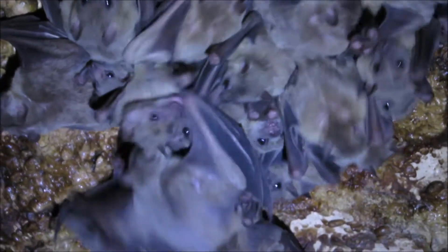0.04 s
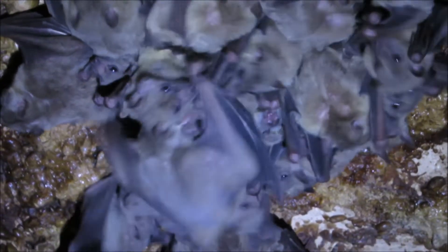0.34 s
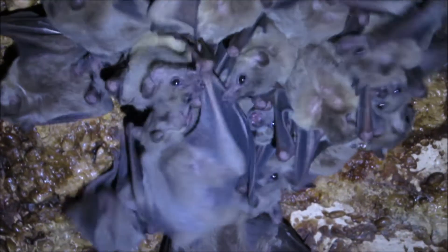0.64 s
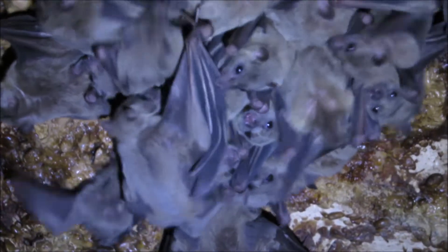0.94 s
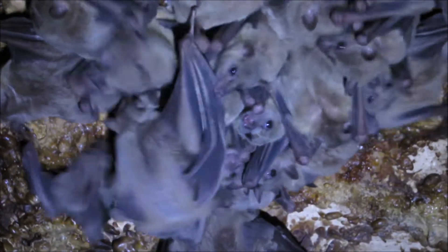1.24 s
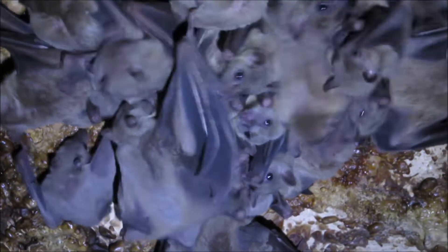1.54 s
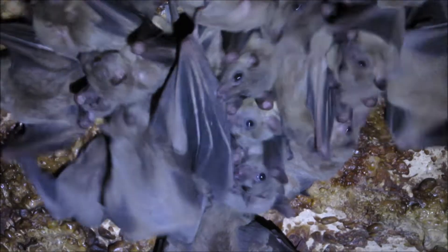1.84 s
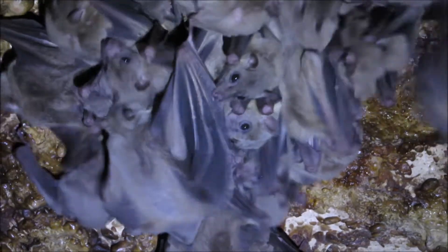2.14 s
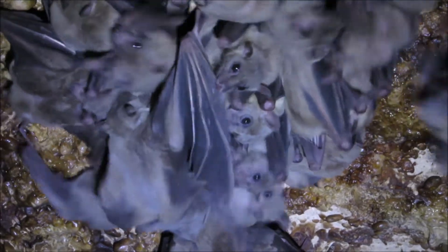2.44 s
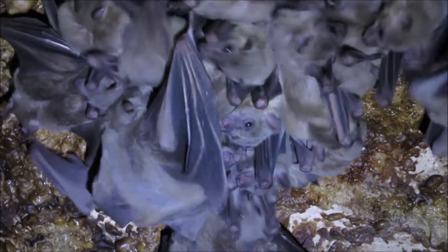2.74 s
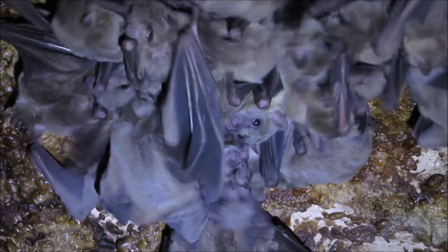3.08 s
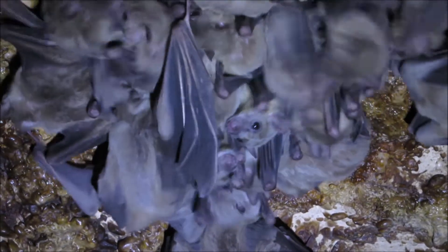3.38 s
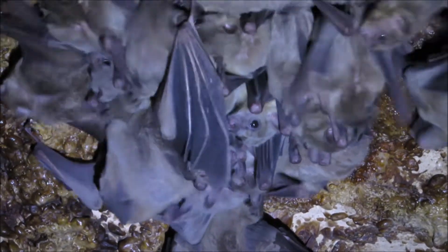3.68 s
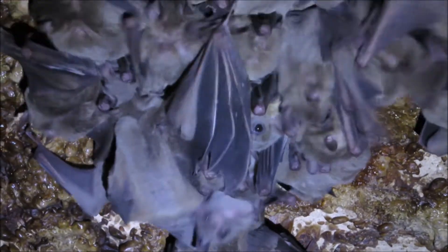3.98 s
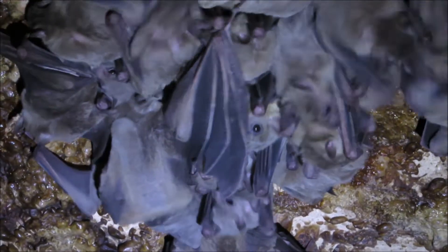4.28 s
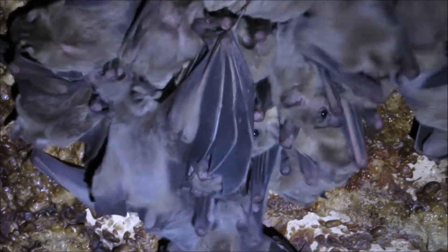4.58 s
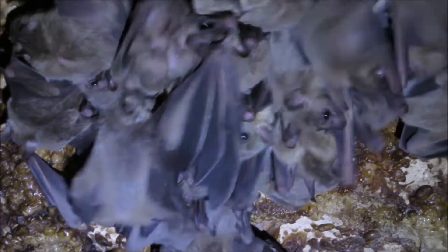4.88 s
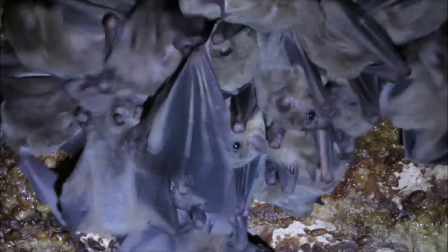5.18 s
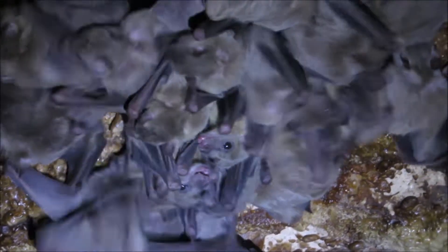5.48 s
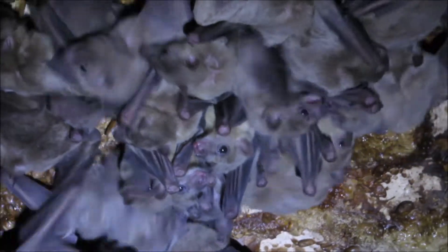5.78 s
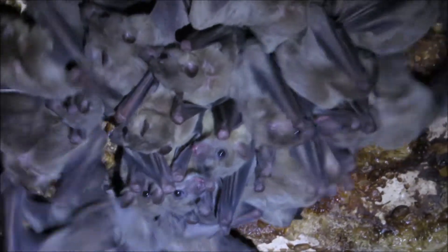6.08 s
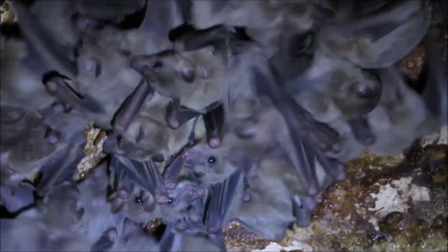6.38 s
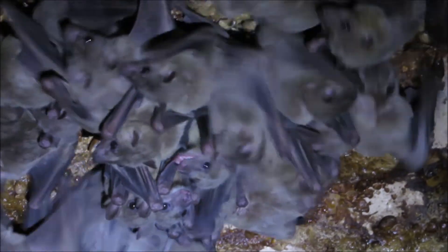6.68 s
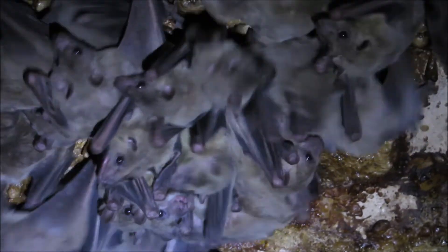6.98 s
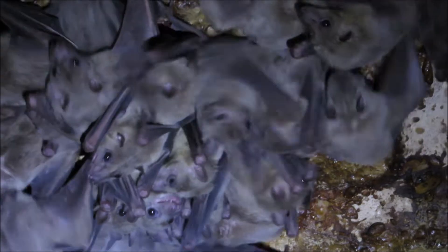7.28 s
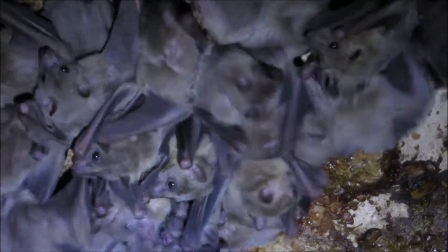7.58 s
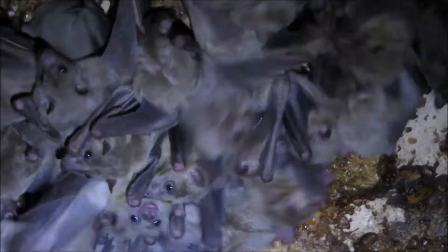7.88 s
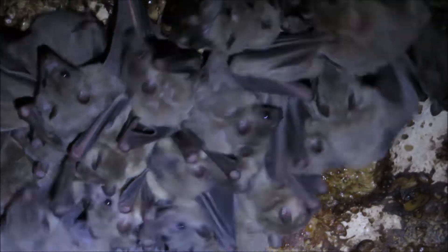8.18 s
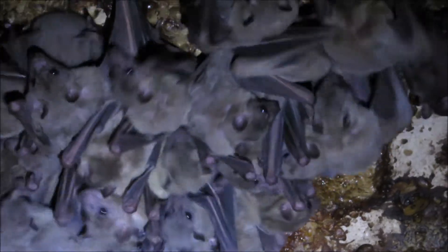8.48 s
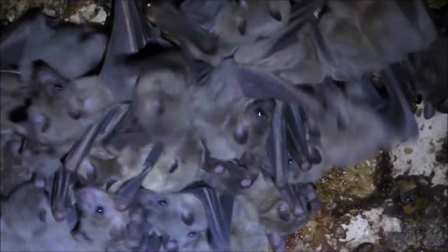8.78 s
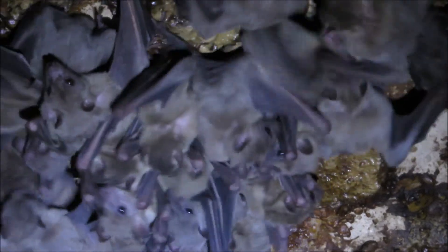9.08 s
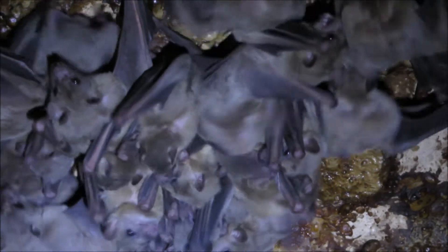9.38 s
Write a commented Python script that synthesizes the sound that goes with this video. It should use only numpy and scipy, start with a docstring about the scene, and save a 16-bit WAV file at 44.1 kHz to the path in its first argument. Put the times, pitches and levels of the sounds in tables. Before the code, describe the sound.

Bursts of rough, shrill bat squawks echo briefly in a cave, with soft grunts, high clicks and a faint deep rush.

```python
"""On a cave wall, fruit bats squabble in a crowded roost, close to a stereo microphone.
Their vocal folds buzz unevenly: a closed mouth gives a grunt through the nose, an open one a rough
screech, and the rock throws the calls back. Between calls come tongue clicks, thin whistles and
the rustle of wing skin on fur, all over the low rush of the cave."""
import sys
import numpy as np
from scipy import signal
from scipy.fft import rfft, irfft, next_fast_len
from scipy.io import wavfile
from scipy.ndimage import uniform_filter1d, map_coordinates

SR = 44100
rng = np.random.default_rng(int(sys.argv[2]) if len(sys.argv) > 2 else 0)


def wav_record(signal):
    """Record a signal, one row per channel, as 16-bit PCM in the file named by sys.argv[1]."""
    frames = np.transpose(np.atleast_2d(signal))
    bounded = np.clip(frames, -1, 1)
    # unit amplitude maps onto the largest positive 16-bit level
    quanta = np.round(bounded * 32767).astype(np.int16)
    wavfile.write(sys.argv[1], SR, quanta)


N = 420273
TREBLE_LIMIT_HZ = 15000


def amp(db):
    """Turns decibels into a factor to multiply by."""
    return 10 ** (np.asarray(db) / 20)


def unit(x):
    """Scales a signal to an average (rms) size of 1."""
    return x / np.sqrt(np.mean(x ** 2) + 1e-20)


def curve_at(points, hz):
    """Looks up hz on a curve through (frequency, value) points."""
    f, value = np.transpose(points)
    return np.interp(np.log(hz + 1), np.log(f + 1), value)


def colour(x, points):
    """Makes each frequency louder or softer, following (f/Hz, level/dB) points."""
    n = x.shape[-1]
    size = next_fast_len(n + 1024)
    gain = amp(curve_at(points, np.fft.rfftfreq(size, 1 / SR)))
    return irfft(rfft(x, size) * gain, size)[..., :n]


def wander(n, hz):
    """A smooth random wobble, about 1 in size, with up to about hz swings a second."""
    place = np.arange(n) * 2 * hz / SR
    knots = rng.standard_normal(n // 12 + 8)
    return map_coordinates(knots[:int(place[-1]) + 4], [place], order=2, mode="mirror")


def add(mix, start_s, sound):
    """Mixes a sound in at the given time."""
    part = mix[max(round(start_s * SR), 0):][:len(sound)]
    part += sound[:len(part)]


def stereo(mid, side):
    """Makes left and right from what they share (mid) and what sets them apart (side)."""
    return np.array([mid + side, mid - side])


# tone of the rush: f/Hz, level/dB
RUSH_TONE = [(15, -46), (25, -9), (98, -1.5), (191, -1.5), (231, -3), (301, -3), (438, -6.5), (952, -10.5),
             (1350, -15.5), (3350, -20.5), (3930, -23.5), (8100, -26), (11800, -31), (15000, -40.5)]
# its stereo width, as side against mid: f/Hz, level/dB
RUSH_WIDTH = [(60, 12.5), (290, 9), (640, 6), (1410, 3.5), (3100, 1), (6820, -0.5), (15000, 1.5)]
# it grows at first, then stays: t/s, level/dB
RUSH_LEVEL = [(0, -55.5), (1.6, -51), (9.53, -50.5)]
def cave_rush(flutter_db=0.225):
    """The cave and its distant crowd blur into a deep noise from all around."""
    mid, side = colour(rng.standard_normal((2, N)), RUSH_TONE)
    level_db = np.interp(np.arange(N) / SR, *np.transpose(RUSH_LEVEL)) + flutter_db * wander(N, 6.7)
    return amp(level_db) * stereo(mid, colour(side, RUSH_WIDTH)) / np.std(mid)


# tone of rubbing wing skin: f/Hz, level/dB
WING_TONE = [(100, 0), (300, 1.5), (800, -2.5), (1400, 0), (2600, -2.5), (3500, -2.5), (5500, -7.5),
             (8000, -9), (11000, -11.5), (14000, -21)]
# wing strokes, timed where they reach full strength: t/s, hold/s, level/dB
WING_STROKES = [(3.168, 0.12, -46.5), (6.509, 0.094, -45)]
def wings(swell_db_per_s=95, fade_db_per_s=178, fidget_db=-70, ticks_per_s=14, tick_s=0.0014):
    """Skin slides on fur in grainy strokes; small fidgets tick all through the colony."""
    t, strokes = np.arange(N) / SR, np.zeros(N)
    rub = unit(colour(rng.standard_normal(N) * amp(5.4 * wander(N, 200)), WING_TONE))
    for crest, hold, db in WING_STROKES:
        before, after = np.maximum(crest - t, 0), np.maximum(t - crest - hold, 0)
        strokes += rub * amp(db - swell_db_per_s * before - fade_db_per_s * after)
    ticks = (rng.random(N) < ticks_per_s / SR) * amp(3.5 * rng.standard_normal(N).clip(-2, 2))
    grains = signal.lfilter([1], [1, -np.exp(-1 / (tick_s * SR))], ticks) * rng.standard_normal(N)
    fidgets = unit(colour(grains, [(300, 7), (2000, -12), (6000, -4.5), (12000, -5), (15000, -27)]))
    return strokes + amp(fidget_db) * fidgets


# tongue and mouth clicks: t/s, level/dB, f/Hz
TONGUE_CLICKS = [(1.218, -32, 11500), (3.226, -39, 11300), (3.467, -31, 12900), (3.486, -32, 12900),
                 (4.935, -17, 11900), (4.964, -13, 9770), (5.081, -22, 9450), (6.206, -13, 7600),
                 (6.209, -16.5, 7860), (6.2132, -22, 7500), (6.233, -26, 12000), (6.238, -14.5, 11400),
                 (7.017, -32, 12500), (8.366, -37, 12300), (8.902, -13.5, 7630)]
def tongue_click(db, hz, spit=0.4, doubling_db=9.5):
    """A high ping with a little spit in it, centred 10 ms after its start; louder ones last longer."""
    t = np.arange(-.01, .01, 1 / SR)
    half_length_s = 0.00051 * 2 ** ((db + 30) / doubling_db)
    fizz = unit(colour(rng.standard_normal(len(t)), [(1500, -26), (6000, 9.0), (14000, 13.5)]))
    ping = np.sin(2 * np.pi * np.cumsum(hz * (1 + 0.07 * wander(len(t), 2267))) / SR)
    return amp(db) * np.exp(-(t / half_length_s) ** 2) * (ping + spit * fizz)


def vocal_folds(hz, rough, uneven_db=4.5, breath=2.84, shimmer_db=3.0):
    """The folds buzz with overtones that swell and fade one by one; each opening lets out a puff."""
    n, cycles = len(hz), np.cumsum(hz) / SR
    buzz = np.zeros(n)
    for k in range(1, int(TREBLE_LIMIT_HZ / hz.mean())):
        buzz += amp(uneven_db * wander(n, 25)) * np.cos(2 * np.pi * (k * cycles + rng.random()))
    puffs = (0.53 + np.exp(-(cycles % 1) / 0.18)) * rng.standard_normal(n)
    air_share = np.clip(breath * rough ** 3, 0, 1)
    voice = np.sqrt(1 - air_share) * unit(buzz) + np.sqrt(air_share) * unit(puffs)
    return voice * amp(shimmer_db * np.sqrt(rough) * wander(n, 415.2))


def resonate(x, hz, width_hz):
    """Rings like the air in a moving mouth, favouring a band that follows hz."""
    turn = np.exp(2j * np.pi * np.cumsum(hz) / SR)
    decay = np.exp(-np.pi * width_hz / SR)
    return 2 * (turn * signal.lfilter([1 - decay], [1, -decay], x / turn)).real


# how the voice rings in the throat, in the mouth and at its shrill top: f/Hz, level/dB
THROAT_TONE = [(700, -3.5), (1050, -1), (1400, -1.5), (1720, 1.5), (2100, -7), (2700, -11.5), (3400, -11.5),
               (4500, -17)]
MOUTH_TONE = [(1800, -45), (2300, -7.5), (2950, -1), (3700, -1), (4600, 1.5), (5400, -1.5), (6400, -2.5),
              (7400, 5.5), (9000, -0.5)]
SHRILL_TONE = [(6000, -23), (8000, 4.5), (8900, 5.5), (10000, 4), (11500, -2), (12800, 1), (14000, -17.5),
               (15500, -58)]
# squawks and screeches (gape is how wide the mouth opens):
# t/s, length/s, pitch/Hz, roughness/0-1, voice level/dB, screech level/dB, gape/0-1
BAT_SQUAWKS = [(2.306, 0.014, 527, .62, -37, -53, 0.1), (2.34, 0.053, 648.5, 0.38, -28.5, -22.5, .72),
               (2.488, 0.021, 602, 0.56, -33, -54, .5), (2.52, 0.038, 611, .5, -30.5, -26, 0.09),
               (2.623, .069, 641.7, .43, -29.5, -21, .58), (2.764, 0.029, 537, .48, -28.5, -30.5, 0.08),
               (3.017, 0.018, 523.3, 0.44, -30, -41, 0.47), (3.554, 0.054, 710.3, 0.45, -26, -11.5, 0.57),
               (3.696, .11, 793, .27, -29, -11, 0.48), (3.88, .071, 769, .28, -31, -10.5, 0.47),
               (4.027, 0.1, 748.3, .15, -32.5, -9.5, 0.48), (4.219, 0.097, 768, 0.31, -31.5, -15.5, 0.62),
               (4.916, .05, 426.4, 0.45, -50, -33.5, 0.82), (5.069, 0.027, 510.5, 0.49, -32.5, -34, 0.44),
               (5.983, 0.031, 591, 0.46, -42.5, -58, 0.15), (7.208, 0.034, 574, 0.5, -30, -44, 0.27),
               (7.316, .043, 577.4, 0.42, -27, -32, .22), (7.437, 0.039, 520, .48, -32, -38, 0.14),
               (7.554, 0.04, 510, 0.52, -34, -43, 0.17), (7.688, 0.033, 617.5, 0.49, -28, -23, 0.73),
               (7.762, 0.02, 465, 0.3, -29.5, -60, 0.3), (7.802, 0.093, 666.4, 0.5, -32.5, -21, 0.57),
               (8.891, 0.11, 697, 0.71, -34.5, -21, 0.42), (8.98, .124, 787.5, 0.48, -25, -14.5, .54),
               (9.096, 0.091, 681.4, 0.5, -28.5, -17, 0.68), (9.205, 0.034, 485, 0.68, -32.5, -34, 0.04),
               (9.255, 0.084, 596.5, 0.51, -30, -18.5, 0.67)]
def squawk(length, pitch_hz, rough, voice_db, screech_db, gape, easy_hz=617.5, end_hz=419.4,
           jitter=0.133, quaver=.055, tremor_db=3.0, release_s=0.012):
    """Uneven fold pulses make the throat and open mouth ring; the mouth shuts and leaves a short moan."""
    rise, moan = min(.034, .56 * length), min(.038, 0.488 * length)
    middle, end = (rise + length) / 2, length + moan
    t = np.arange(0, end, 1 / SR)
    n = len(t)
    # a clear screech holds its pitch until the mouth shuts; a rough one droops and wavers
    start_hz = easy_hz + 0.1214 * (pitch_hz - easy_hz)
    droop_hz = pitch_hz + min(1.8 * rough ** 2, 1) * (end_hz - pitch_hz)
    arch = np.interp(t, [0, .75 * rise, middle, length, end],
                     [start_hz, pitch_hz, pitch_hz, droop_hz, end_hz])
    hz = arch * (1 + jitter * rough ** 1.5 * wander(n, 220) + quaver * rough * wander(n, 51))
    buzz = vocal_folds(hz, rough) * amp(tremor_db * wander(n, 59.2))
    throat = amp(-10 + 17.5 * rough) * unit(colour(buzz, THROAT_TONE))
    # the mouth rings higher with a wider gape, and its note swings with the jaw
    mouth_hz = 4360 + 2590 * gape
    jaw = np.interp(t, [rise, middle, length, end], [0.73, -0.35, 0.55, 0.31])
    ring_hz = mouth_hz * (1 + 0.072 * jaw + .025 * wander(n, 40))
    # a wide mouth or a rough voice spreads the ringing over more frequencies
    spread = (mouth_hz / 5800) ** 3 * 2 ** (1.9 * (rough - .4))
    mouth = unit(resonate(colour(buzz, MOUTH_TONE), ring_hz, width_hz=1100 * spread))
    shrill_hz = np.clip(2.28 * ring_hz, 9800, 10800)
    shrill = unit(resonate(colour(buzz, SHRILL_TONE), shrill_hz, width_hz=2600 * spread))
    screech = mouth + amp(-9.5 + 17.5 * gape) * shrill
    # a loud screech starts softly too, and swells further
    onset_db = -15 - max(screech_db + 20, 0)
    opening_db = np.interp(t, [0, rise, length, length + release_s, length + 3 * release_s],
                           [onset_db, 1, -3, -16, -45])
    effort = amp(voice_db + np.interp(t, [0, rise, length, end], [-10, -4.5, -5, -10]))
    # the voice's lowest note carries on as the moan
    low_note = np.sin(2 * np.pi * np.cumsum(hz) / SR) * amp(12 * rough * wander(n, 177.6))
    closing = np.interp(t, [length, length + moan / 2, end], [1, .15, 0])
    voice = amp(-0.5) * unit(low_note) + closing * throat
    fade = np.clip(t / 0.0015, 0, 1) * np.clip((t[-1] - t) / 0.0013, 0, 1)
    return fade * (effort * voice + amp(screech_db + opening_db) * screech)


# tone of the hum and of the hiss in the nose: f/Hz, level/dB
NOSE_HUM_TONE = [(100, -61), (215, -1.5), (300, -9), (420, 5.5), (560, -4.5), (850, -13), (1400, -33.5)]
NOSE_HISS_TONE = [(500, -9), (1100, 0.5), (2000, 5), (3500, -6), (6000, 1.5), (11000, -20), (15000, -55)]
# closed-mouth grunts: t/s, pitch/Hz, level/dB
BAT_GRUNTS = [(2.405, 200.4, -37.5), (3.989, 204.4, -42.5), (4.153, 198.3, -42.5), (4.435, 213, -43),
              (4.59, 226.4, -46), (4.667, 221, -44), (4.808, 216.6, -43.5), (4.94, 211, -41),
              (4.998, 249.4, -42.5), (5.146, 243.8, -44.5), (5.438, 232.7, -39.5), (5.541, 221.3, -42.5),
              (5.591, 255, -44.5), (5.68, 220.3, -39.5), (7.886, 211, -34.5), (9.385, 239, -57)]
def grunt(pitch_hz, db, length=.05, fall=0.194, jitter=.06, lumps_db=3, hiss_db=-24.5):
    """The folds buzz through the nose in a short, lumpy cluck that falls in pitch."""
    n = int(length * SR)
    progress = np.linspace(0, 1, n)
    hz = pitch_hz * (1 + fall * (.4 - progress) + jitter * wander(n, 129))
    buzz = vocal_folds(hz, rough=0.54) * amp(lumps_db * wander(n, 84.4))
    hum, hiss = unit(colour(buzz, NOSE_HUM_TONE)), unit(colour(buzz, NOSE_HISS_TONE))
    swell = np.interp(progress, [0, .15, .4, .7, 1], [1.75, 1.55, 0.92, 1.6, 0.15])
    return amp(db) * swell * (hum + amp(hiss_db) * hiss)


# thin whistles: t/s, length/s, start f/Hz, end f/Hz, level/dB
BAT_WHISTLES = [(2.765, 0.022, 5430, 5540, -33), (5.995, 0.05, 1115, 1210, -49),
                (6.039, 0.21, 4520, 4620, -64.5), (6.18, 0.0242, 2530, 1650, -42.5)]
def whistle(length, start_hz, end_hz, db):
    """A thin, slightly unsteady pure note slides from one pitch to another."""
    n = int(length * SR)
    hz = np.linspace(start_hz, end_hz, n) * (1 + 0.017 * wander(n, 152))
    swell = signal.windows.tukey(n, .5) * amp(2.7 * wander(n, 56))
    return amp(db) * unit(swell * np.sin(2 * np.pi * np.cumsum(hz) / SR))


# how long the echo takes to fade by 60 dB: f/Hz, time/s
ECHO_FADE = [(200, 0.5), (700, 0.45), (2000, 0.27), (6000, 0.1926), (14000, 0.1227)]
# tone of the echo: f/Hz, level/dB
ECHO_TONE = [(200, -5.5), (700, -6.5), (2400, -3), (5000, -5.5), (14000, -10)]
# its stereo width, as side against mid: f/Hz, level/dB
ECHO_WIDTH = [(200, -32), (700, -3), (2400, -14.5), (5000, -7.5), (14000, 2.5)]
def cave_echo(x, direct_db, tail_db, near_db=-5, near_count=14):
    """Sound arrives directly, then bounces off the near rock, then dies away in a tail of echoes."""
    n = SR * 3 // 4
    # the tail: one echo at a random moment in every 20 samples
    slots = np.arange(300, n - 20, 20)
    shape, echoes = (2, len(slots)), np.zeros((2, n))
    np.put_along_axis(echoes, slots + rng.integers(0, 20, shape), rng.choice([-1., 1.], shape), 1)
    hz, t, bands = signal.stft(echoes, SR, nperseg=256)
    fade_s = curve_at(ECHO_FADE, hz)[:, None]
    tail = signal.istft(bands * 1000. ** (-t / fade_s) / np.sqrt(fade_s), SR, nperseg=256)[1]
    mid, side = amp(tail_db) * colour(tail / np.linalg.norm(tail[0]), ECHO_TONE)
    # each near bounce reaches left and right at slightly different times
    early = np.zeros((2, len(mid)))
    delay, skew = rng.integers(40, 700, near_count), rng.choice([-1, 1], near_count)
    strength = rng.choice([-1., 1.], near_count) * amp(near_db) / np.sqrt(near_count)
    early[0, delay + skew], early[1, delay - skew] = strength, strength
    early[:, 0] = amp(direct_db)
    response = early + stereo(mid, colour(side, ECHO_WIDTH))
    return signal.fftconvolve(x[None], response, axes=1)[:, :N]


def scene():
    """The squabblers hang close by; the grunts come from another spot in the cluster."""
    close, grunts = wings(), np.zeros(N)
    for start, *settings in BAT_SQUAWKS:
        add(close, start, squawk(*settings))
    for start, *settings in BAT_GRUNTS:
        add(grunts, start, grunt(*settings))
    for start, *settings in BAT_WHISTLES:
        add(close, start, whistle(*settings))
    for centre, *settings in TONGUE_CLICKS:
        add(close, centre - .01, tongue_click(*settings))
    bats = cave_echo(close, direct_db=-1.55, tail_db=0.5) + cave_echo(grunts, direct_db=-2, tail_db=0)
    return bats + cave_rush()


# how far the right side lags behind the left: f/Hz, lag/radians
RIGHT_LAG = [(0, 0.12), (8000, 0.093), (11000, 0.85), (13000, 1.8), (15000, -1)]
def microphone_ports(x):
    """The microphone's two openings drift out of step in the highest treble."""
    size = next_fast_len(N + 256)
    lag = np.exp(-1j * curve_at(RIGHT_LAG, np.fft.rfftfreq(size, 1 / SR)))
    return np.array([x[0], irfft(rfft(x[1], size) * lag, size)[:N]])


def record(dry, threshold_db=-21, squeeze=0.5, recovery_db_per_s=70, notch_width_hz=260):
    """A limiter turns everything down in the loudest screeches; two thin bands and the top are cut."""
    power = uniform_filter1d((dry ** 2).mean(0), size=260)
    power_db = 10 * np.log10(np.abs(power) + 1e-12)
    recovery_db = np.arange(N) * recovery_db_per_s / SR
    held_db = np.maximum.accumulate(power_db + recovery_db) - recovery_db  # jumps up, sinks slowly
    cut_db = squeeze * np.maximum(held_db - threshold_db, 0)
    out = microphone_ports(dry) * amp(-uniform_filter1d(cut_db, size=100))
    out = 0.97 * np.tanh(out / 0.85)  # spikes too quick for the limiter are rounded off
    for hz in (3970, 7950):
        out = signal.lfilter(*signal.iirnotch(hz, hz / notch_width_hz, SR), out)
    treble_cut = signal.firwin(161, TREBLE_LIMIT_HZ, window=("kaiser", 9), fs=SR)
    return signal.oaconvolve(out, treble_cut[None], "same")


dry = scene()
out = record(dry)
wav_record(out)
```